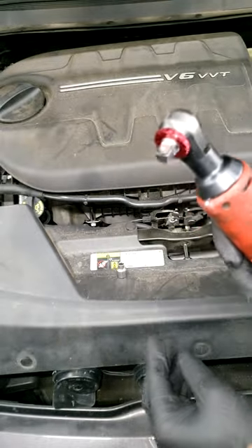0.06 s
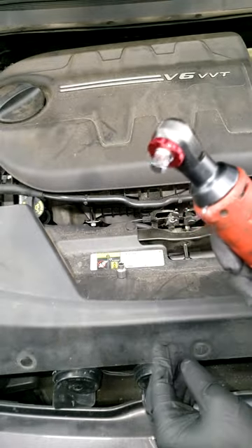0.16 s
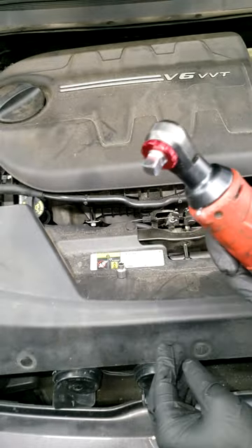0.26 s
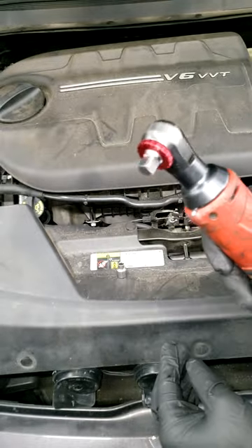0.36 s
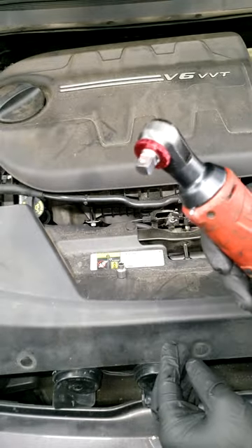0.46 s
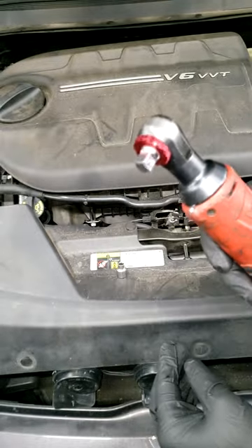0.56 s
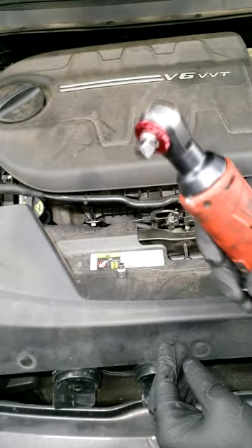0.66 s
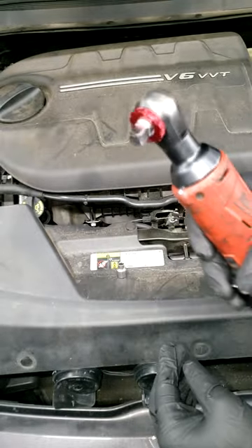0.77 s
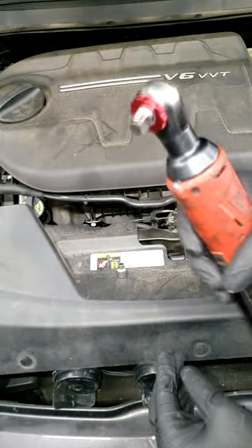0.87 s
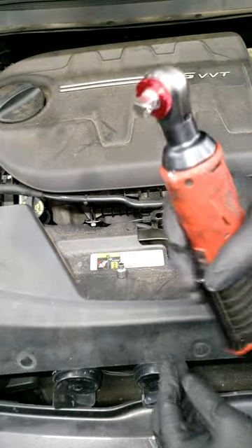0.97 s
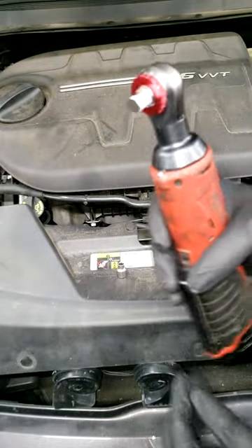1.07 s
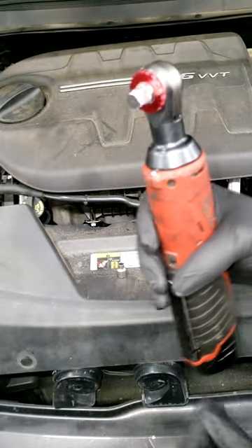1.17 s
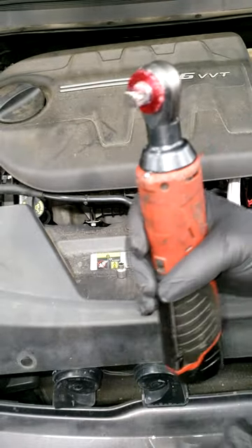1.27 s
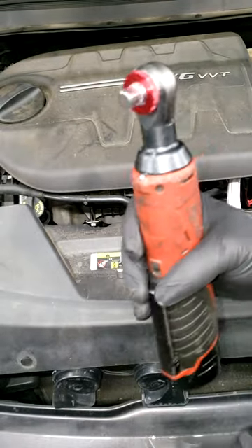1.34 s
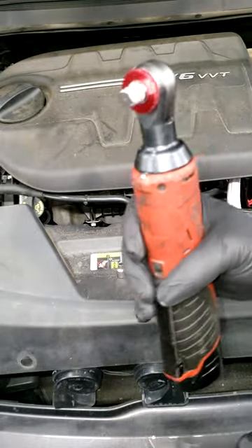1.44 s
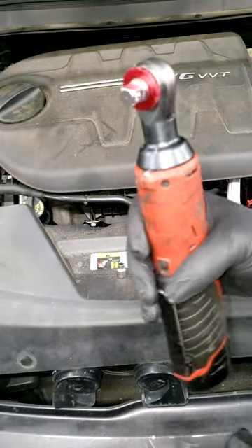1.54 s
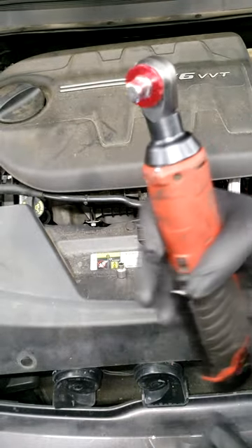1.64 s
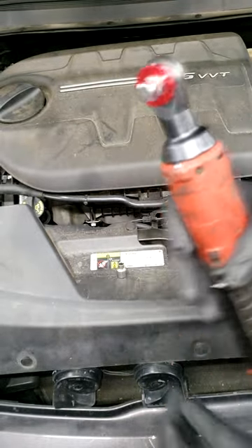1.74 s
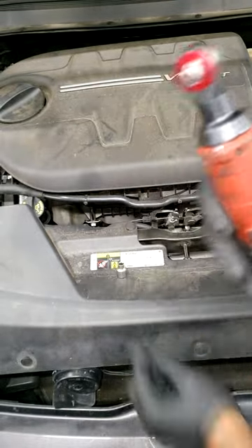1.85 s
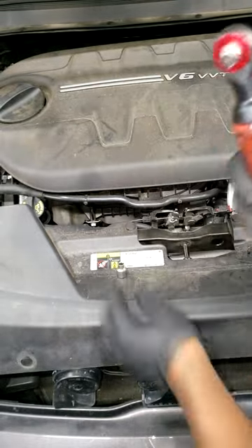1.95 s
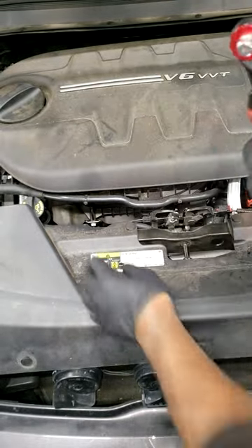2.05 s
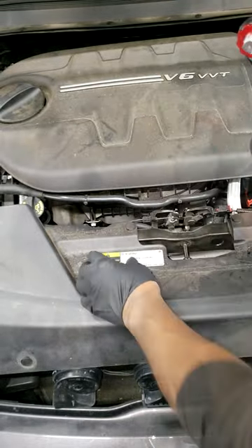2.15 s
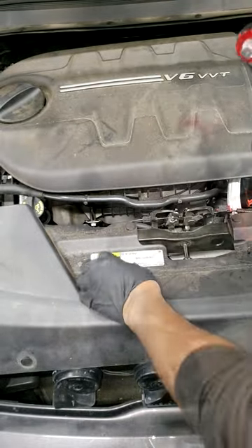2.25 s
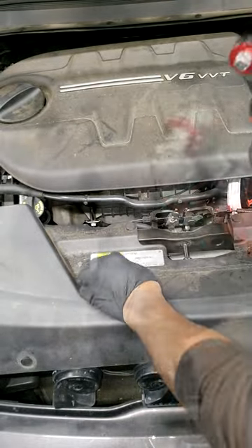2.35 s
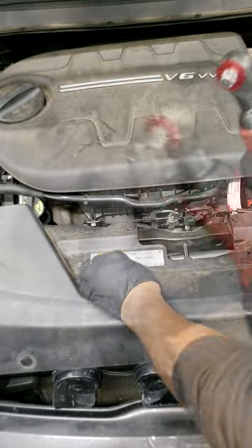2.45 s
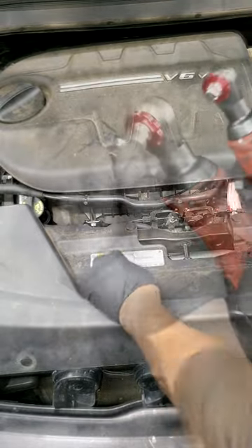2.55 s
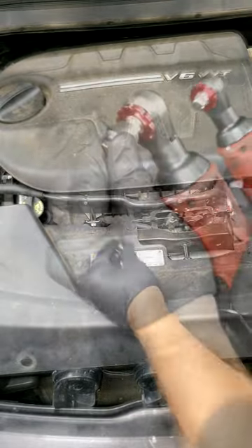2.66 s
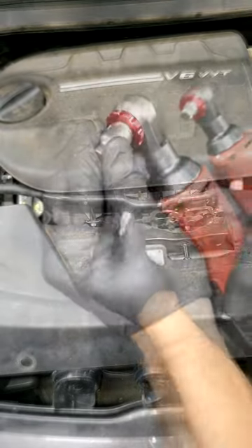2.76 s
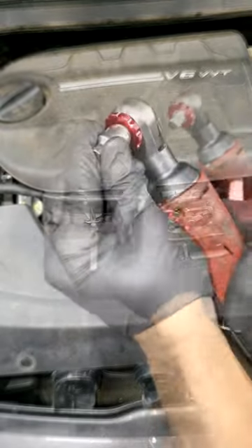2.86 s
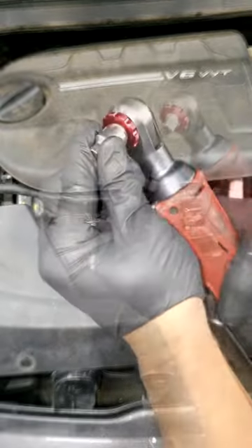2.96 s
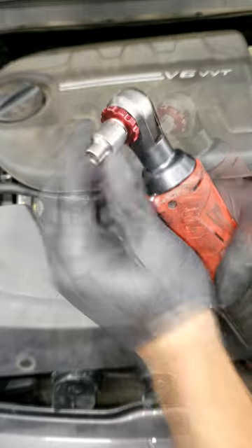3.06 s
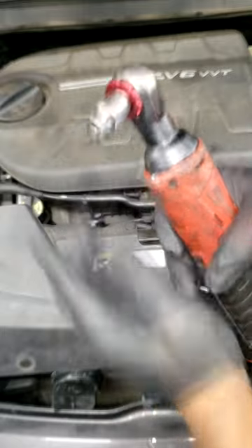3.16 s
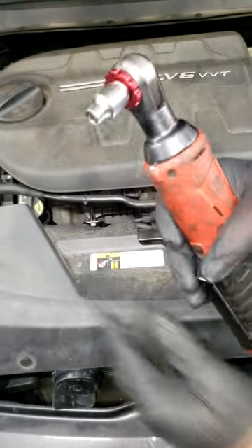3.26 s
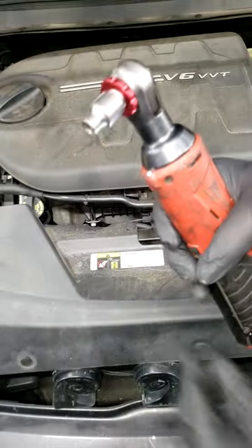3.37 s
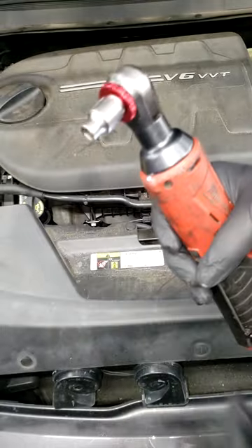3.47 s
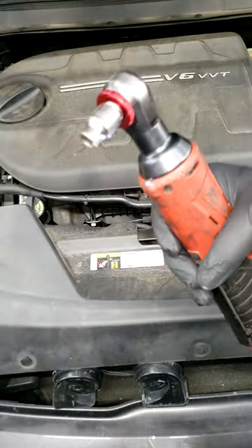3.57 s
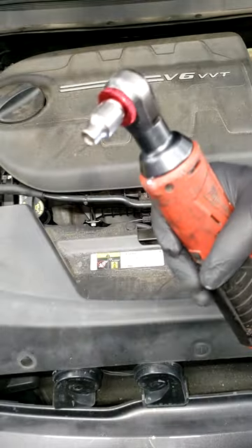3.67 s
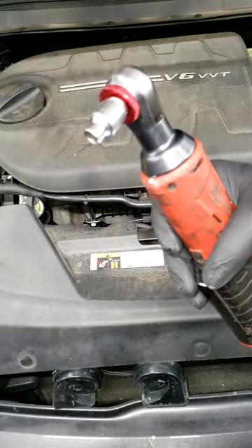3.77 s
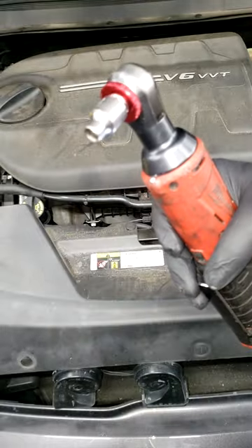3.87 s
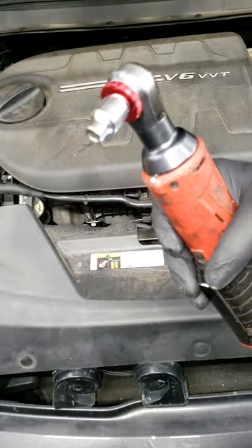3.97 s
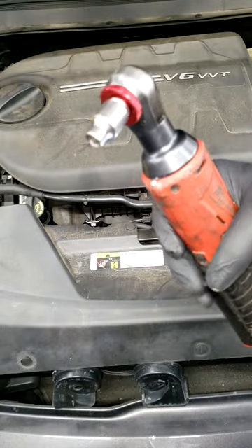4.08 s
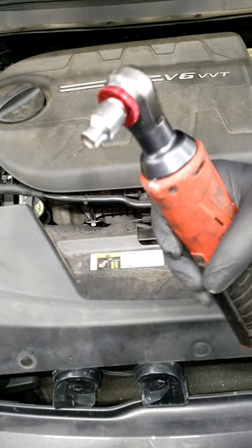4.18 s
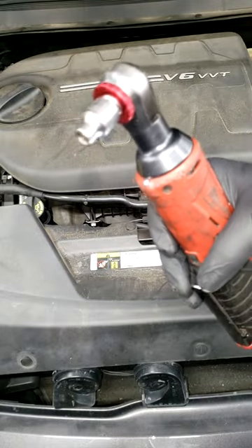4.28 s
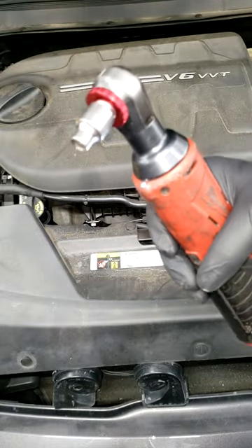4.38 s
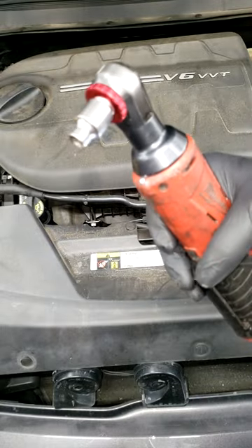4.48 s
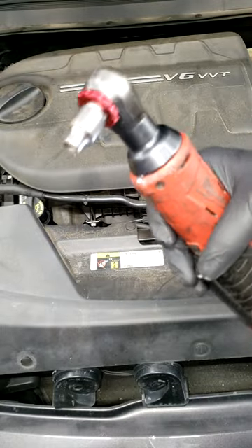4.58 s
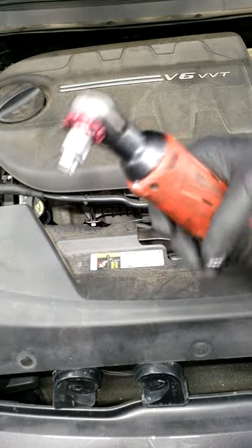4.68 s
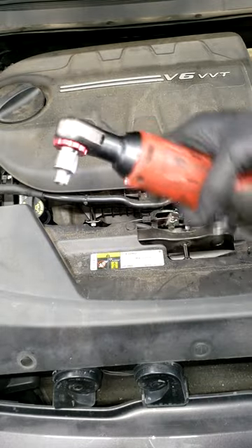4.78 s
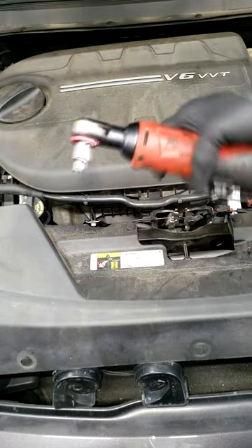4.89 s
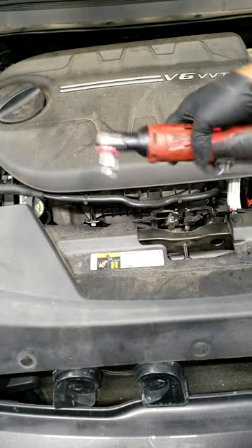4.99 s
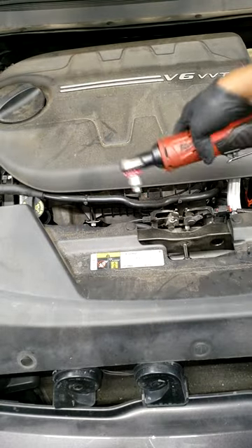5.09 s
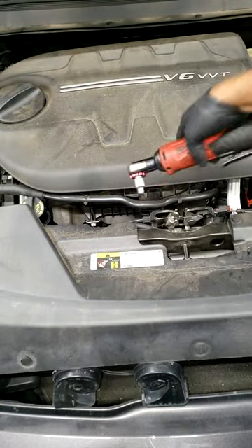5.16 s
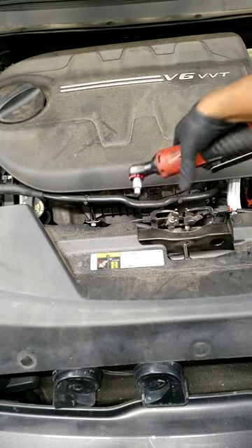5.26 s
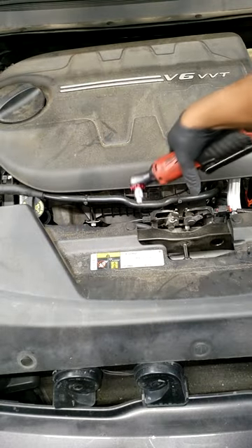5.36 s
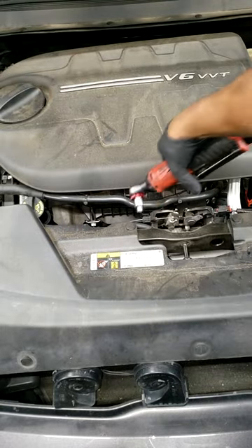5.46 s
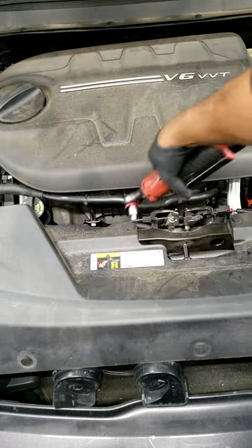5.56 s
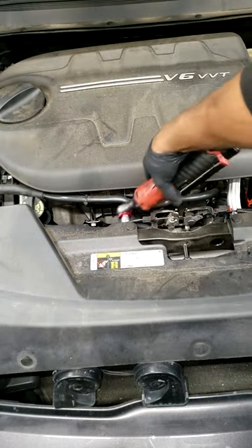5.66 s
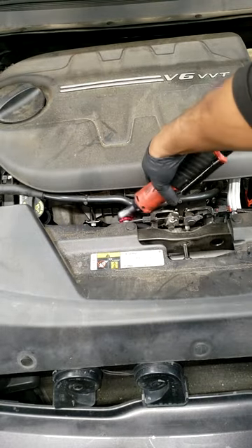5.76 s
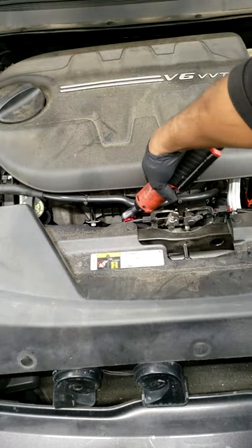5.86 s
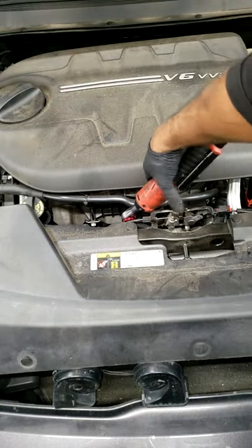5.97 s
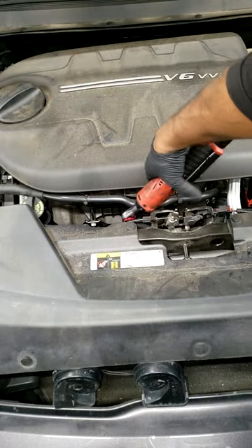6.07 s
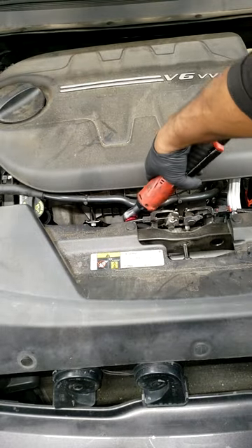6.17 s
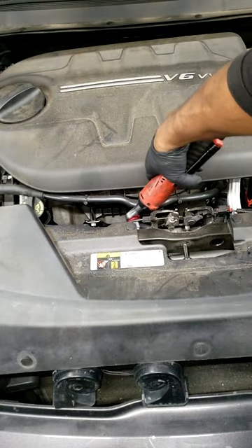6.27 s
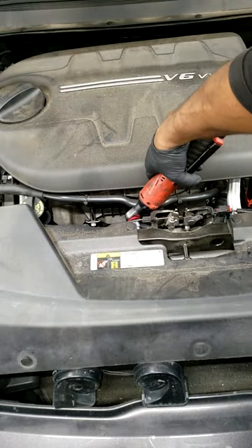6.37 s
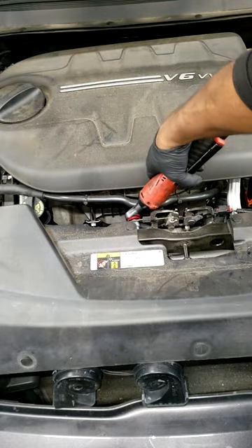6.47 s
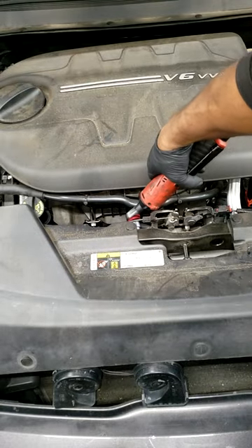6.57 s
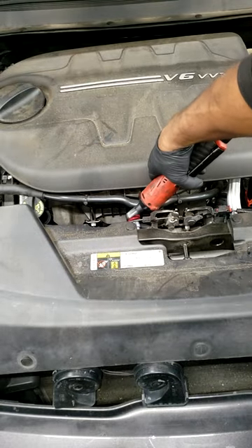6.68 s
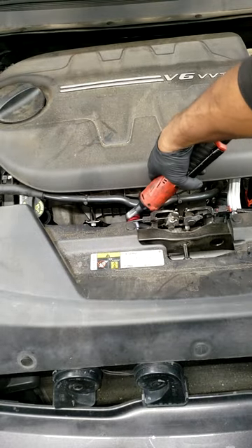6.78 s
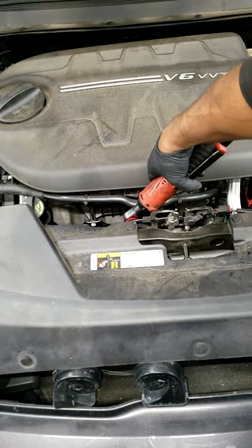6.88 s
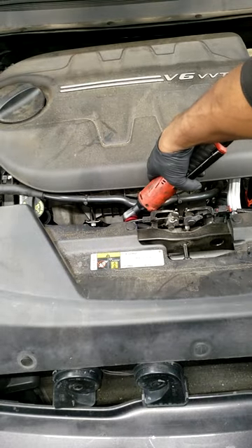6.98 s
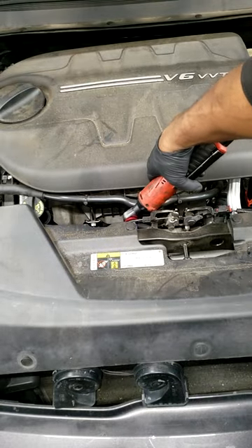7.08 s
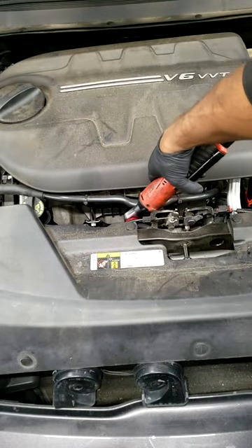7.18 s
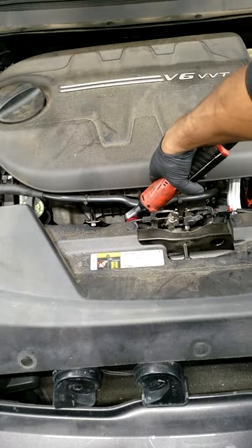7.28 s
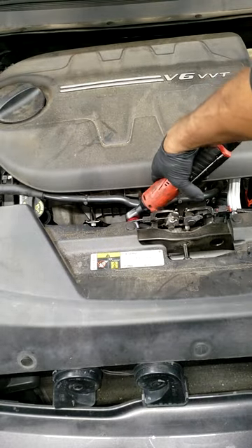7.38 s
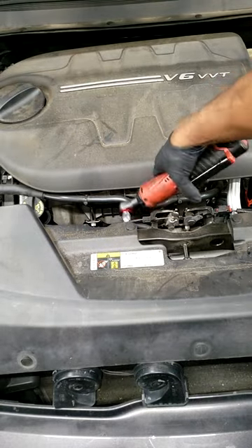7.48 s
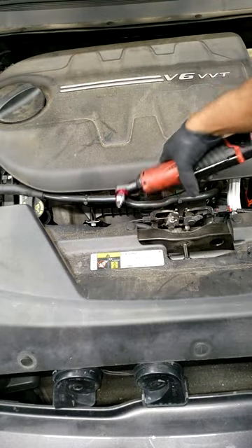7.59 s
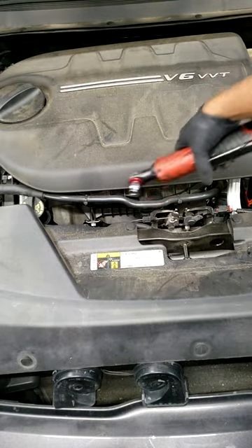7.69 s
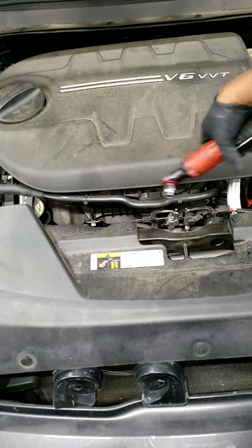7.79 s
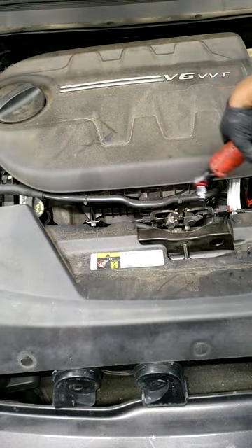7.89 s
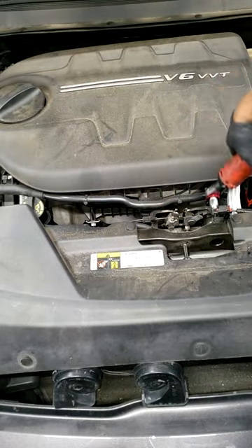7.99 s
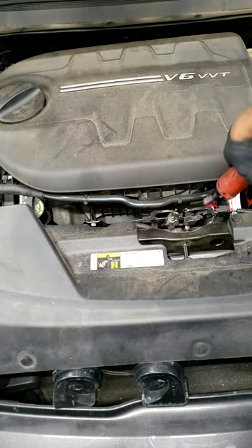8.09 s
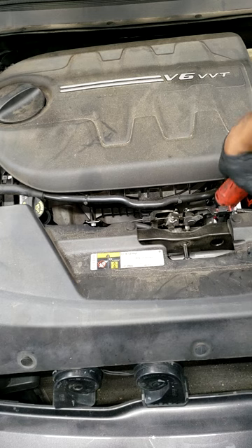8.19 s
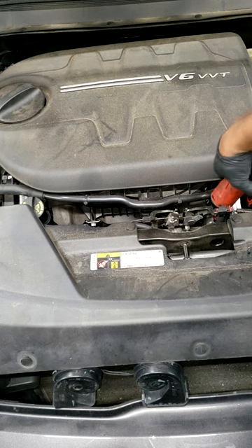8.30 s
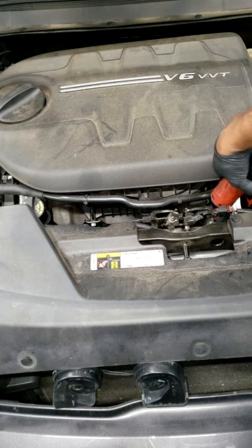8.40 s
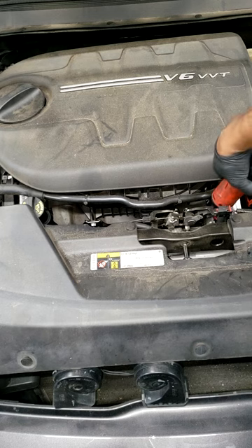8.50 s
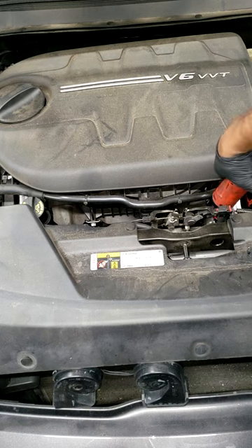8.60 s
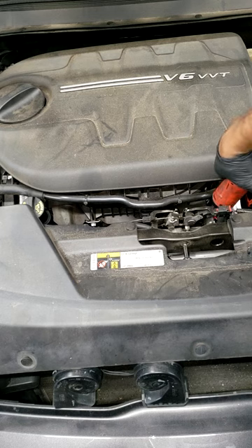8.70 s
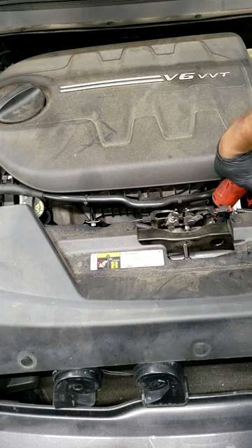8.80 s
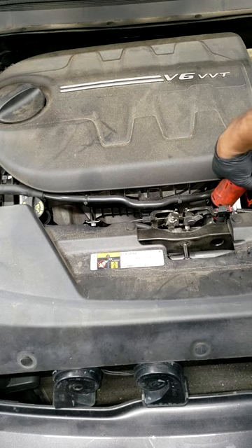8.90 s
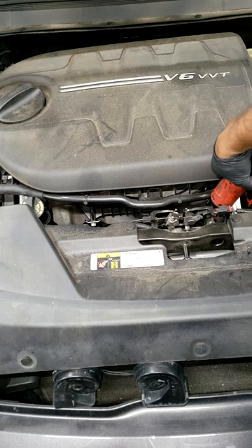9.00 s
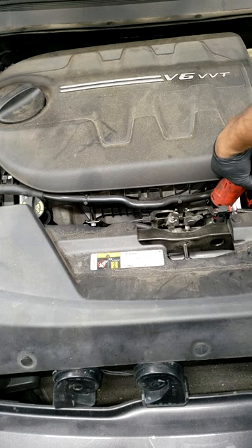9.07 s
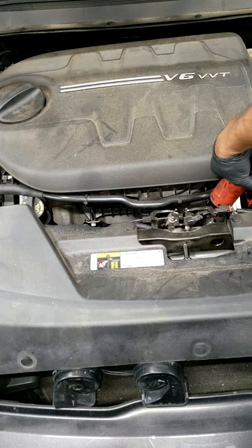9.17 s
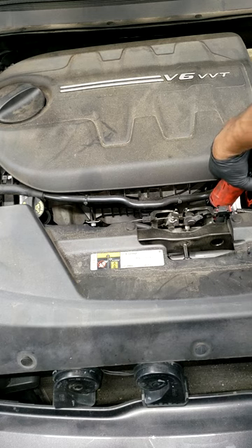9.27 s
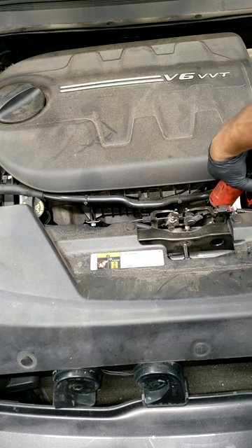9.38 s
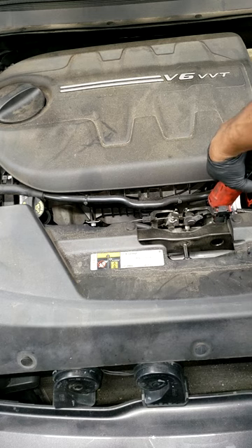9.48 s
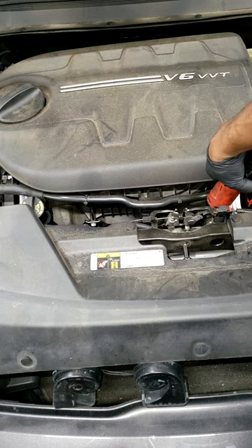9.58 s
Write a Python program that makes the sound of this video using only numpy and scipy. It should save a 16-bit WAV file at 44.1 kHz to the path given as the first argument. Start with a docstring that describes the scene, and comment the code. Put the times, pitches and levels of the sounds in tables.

```python
"""Cordless ratchet over an engine bay

It is blipped in the air, gets a socket snapped on, is blipped again, then spins two bolts; a workshop hums behind.
A crank model (run-up, then friction and drag) gives the speed, and its turns time every contact of the mechanism.
The pawl clacks and rings the steel head (clicks exciting noise bursts), the gears rattle and the motor whines;
left to coast, the tool slows towards single clacks. Seated on a bolt it shakes panels: a drone, a buzz and chatter."""
import sys
import numpy as np
from scipy import signal
from scipy.fft import rfft, irfft
from scipy.io import wavfile
from scipy.ndimage import uniform_filter1d

SR = 44100
rng = np.random.default_rng(int(sys.argv[2]) if len(sys.argv) > 2 else 0)


def transcribe(signal):
    """Save signal, clipped to [-1, 1], as a 16-bit WAV file at the path in sys.argv[1]."""
    frames = np.atleast_2d(signal).T
    limited = np.clip(frames, -1, 1)
    pcm = np.round(limited * 32767).astype(np.int16)
    wavfile.write(sys.argv[1], SR, pcm)


N = 425124   # length in samples


def from_db(db):
    """Amplitude ratio: 20 dB for each factor of ten."""
    return 10 ** (np.asarray(db) / 20)


def rms_one(x):
    """Normalisation to unit root-mean-square amplitude."""
    return x / np.sqrt(np.mean(x ** 2) + 1e-20)


def in_time(rows, **ends):
    """Linear interpolation of rows of (t/s, value) at every sample."""
    return np.interp(np.arange(N) / SR, *np.transpose(rows), **ends)


def gain_curve(tables):
    """Envelope: gain along tables of (t/s, level/dB), silent between them."""
    return sum(from_db(in_time(rows, left=-np.inf, right=-np.inf)) for rows in tables)


def band(x, hz, kind):
    """Butterworth filtering: maximally flat in the passed band."""
    edges = np.minimum(hz, .45 * SR)
    return signal.sosfilt(signal.butter(2, edges, kind, fs=SR, output="sos"), x)


def convolve(x, response):
    """Linear superposition: each sample sets off a copy of the impulse response."""
    return signal.oaconvolve(np.atleast_2d(x), np.atleast_2d(response), axes=-1)[:, :N]


def response_of(spectrum, size=4096):
    """Minimum phase: folding the cepstrum gives the causal response of a magnitude spectrum."""
    hz, db = np.transpose(spectrum)
    grid = np.maximum(np.arange(size // 2 + 1) * SR / size, 1)
    magnitude = from_db(np.interp(np.log(grid), np.log(hz), db))
    cepstrum = irfft(np.log(magnitude))
    cepstrum[1:size // 2] *= 2
    cepstrum[size // 2 + 1:] = 0
    return irfft(np.exp(rfft(cepstrum)))


def colour(x, spectrum):
    """Spectral shaping by a unit-energy response, which keeps the power of a white sound."""
    response = response_of(spectrum)
    return convolve(x, response / np.linalg.norm(response))


# width of the stereo image: f/Hz, level of side minus mid/dB
WIDTH_SPECTRUM = [(100, -13), (400, -12), (1200, -8.5), (4000, 3.5), (15000, -6.5)]


def stereo_noise():
    """Mid-side stereo: white noise, alike on both sides in the bass and less so in the treble."""
    mid, side = rng.standard_normal((2, N))
    return mid + convolve(side, response_of(WIDTH_SPECTRUM)) * [[1], [-1]]


def clicks_at(seconds, sizes):
    """Impulse train: one sample of the given size at each time."""
    samples = np.clip(np.asarray(seconds) * SR, 0, N - 1).astype(int)
    return np.bincount(samples, sizes, N)


def bursts(clicks, t60):
    """Exponential decay: each click excites a dense cluster of modes, as noise losing 60 dB in t60 seconds."""
    keep_per_sample = from_db(-120 / (t60 * SR))   # acts on power
    power = signal.lfilter([1], [1, -keep_per_sample], clicks ** 2 + 1e-18)
    return np.sqrt(power) * stereo_noise()


def evened(x, hz, size=2400):
    """Slow level normalisation: holds the level within a band near 1, keeping the single strokes."""
    power = band(x.mean(0), hz, "band") ** 2
    slow = uniform_filter1d(uniform_filter1d(power, size), size)
    return x / np.sqrt(np.abs(slow) + power.mean() / 1000)


def echoes(t60, seconds):
    """Diffuse reverberation: decaying noise of unit energy, different on each side."""
    t = np.arange(int(seconds * SR)) / SR
    tail = rng.standard_normal((2, len(t))) * from_db(-60 * t / t60) * (t > .002)
    return tail / np.linalg.norm(tail, axis=1, keepdims=True)


def strokes(turns, place, scatter_db, jitter_s):
    """Periodic impact: one contact per crank turn, at a given place in the turn."""
    at = np.flatnonzero(np.diff(np.floor(turns - place)) > 0) / SR
    late, force = rng.standard_normal((len(at), 2)).T
    return clicks_at(at + jitter_s * late, from_db(scatter_db * force))


def rattle(speed, per_turn, scatter_db):
    """Random impact process: chance contacts of loose parts, denser as the crank speeds up."""
    struck = rng.random(N) < per_turn * speed / SR
    return struck * from_db(scatter_db * np.minimum(rng.standard_normal(N), 2))


# trigger pulls: t/s, time held/s
TRIGGER_PULLS = [(.0065, .0464), (.3497, .0292), (.6404, .0287), (.9306, .0429), (1.2777, .0894),
                 (3.4502, .2356), (4.1898, .0218), (4.4799, .0047), (6.2658, .8305), (8.866, .9)]
TOP_SPEED, SPIN_UP_S = 87.6, .0422   # speed approached (strokes per s), time constant of the run-up (s)
FRICTION, DRAG_PER_S = 56.84, .594   # dry friction (strokes per s lost each second), drag (per s)


def crank_speed():
    """First-order dynamics: a pull runs the crank up towards top speed; let go, friction and drag slow it."""
    speed, brake = np.zeros(N), FRICTION / DRAG_PER_S
    for s, held in TRIGGER_PULLS:
        start = int(s * SR)
        t = np.arange(N - start) / SR
        run_up = np.exp(-np.minimum(t, held) / SPIN_UP_S)
        driven = TOP_SPEED + (speed[start] - TOP_SPEED) * run_up
        coast = np.exp(-DRAG_PER_S * np.maximum(t - held, 0))
        speed[start:] = np.maximum((driven + brake) * coast - brake, 0)
    return speed


def pace(speed):
    """Scaling variable of excitation: crank speed averaged over 66 ms, 1 at 60 strokes per s."""
    return np.abs(uniform_filter1d(speed, size=2900)) / 60


LIFT_DB_PER_S = 200   # fall once the socket comes off


def seated(on, lifted):
    """Contact coupling: 1 while the socket sits on a bolt, decaying exponentially once it is lifted."""
    t = np.arange(N) / SR
    return (t > on) * from_db(-LIFT_DB_PER_S * np.maximum(t - lifted, 0))


# loudness as the tool is turned and moved about: t/s, relative pawl level/dB, relative gear level/dB
TOOL_LOUDNESS = [(0, -15.5, -24), (0.999, -18.5, -28), (1.55, -20, -30), (2.3, -23.5, -31),
                 (3.55, -24.5, -30.5), (4.2, -22, -36), (5, -28, -31.5), (6.4, -23.5, -30.5),
                 (7.1, -24.5, -36.5), (8.05, -25, -32), (8.9, -27, -33), (9.64, -25, -32)]
# socket on a bolt, also used by panels: on t/s, lifted t/s, relative level of the panel shaking/dB
BOLT_CONTACTS = [(6.25, 7.39, -32), (8.85, 9.64, -32.5)]
SEATED_PAWL_DB = -4


def pawl_db():
    """Contact damping: the relative level of the pawl is lower while a bolt holds the head."""
    on_bolt = sum(seated(on, lifted) for on, lifted, _ in BOLT_CONTACTS)
    return in_time(np.array(TOOL_LOUDNESS)[:, :2]) + SEATED_PAWL_DB * on_bolt


def gears_db():
    """Source level: the relative level shared by the gear train and motor."""
    return in_time(np.array(TOOL_LOUDNESS)[:, ::2])


# spectrum of the workshop: f/Hz, relative level per Hz/dB
SHOP_SPECTRUM = [(22, -19.5), (60, 1.5), (120, -5.5), (250, -14), (420, -22.5), (800, -49.5), (1500, -30.5),
                 (2500, -46), (4500, -49), (7000, -40), (9000, -54), (16000, -44.5)]
# rumble of the workshop: t/s, level/dB
SHOP_RUMBLE = [(0, -52), (1.7, -61.5), (2.4, -53.5), (3.3, -54.5), (4.1, -65), (5.4, -62.5), (9.64, -57)]


def workshop():
    """Broadband flow noise of ventilation: a low rumble that swells and sinks, under a faint hiss."""
    air = colour(stereo_noise(), SHOP_SPECTRUM)
    rumble = from_db(in_time(SHOP_RUMBLE)) * rms_one(band(air, 227, "low"))
    hiss = from_db(-72.0) * rms_one(band(air, 470, "high"))
    return rumble + hiss


# motor driver chirps at a trigger pull: t/s, relative level/dB
DRIVER_CHIRPS = [(3.451, -55.5), (6.246, -59), (8.845, -67)]
# glove rubbing on the handle, one table a rub: t/s, level/dB
GLOVE_RUBS = [
    [(3, -73), (3.06, -71), (3.14, -79)],
    [(5.23, -96), (5.3, -73.5), (5.5, -73.5), (5.69, -82)],
]
DRIVER_HZ = 1860


def handling():
    """Harmonic and frictional excitation: the pulsed motor driver sings for an instant; the glove rustles."""
    t = np.arange(N) / SR
    tone = sum(np.sin(2 * np.pi * k * DRIVER_HZ * t) / k ** .5 for k in range(1, 5))
    chirps = sum(from_db(db) * np.exp(-((t - s) / 0.0081) ** 2) for s, db in DRIVER_CHIRPS)
    grit = bursts(1. * (rng.random(N) < 900 / SR), t60=.01)   # 900 grains per s
    rustle = rms_one(band(grit, [1250, 1750], "band") + 0.45 * band(grit, [2400, 3100], "band"))
    return tone * chirps + rustle * gain_curve(GLOVE_RUBS)


# notes that panels keep after a landing: t/s, f/Hz, initial level/dB
PANEL_NOTES = [(5.81, 529, -65), (8.262, 279.6, -60)]


def singing_panels(t60):
    """Free vibration of a single mode: a knocked panel keeps one faint, decaying note."""
    t = np.arange(N) / SR
    notes = 0
    for s, hz, db in PANEL_NOTES:
        decay = (t > s) * from_db(db - 60 * np.abs(t - s) / t60)
        notes += decay * np.sin(2 * np.pi * hz * (t - s))
    return notes


# socket handled and snapped on, small parts ticking: t/s, relative crack level/dB, relative ring level/dB
SOCKET_SNAPS = [(2.7742, -12.5, -35), (3.029, -51, -63), (3.203, -39.5, -64.5), (3.36, -33.5, -59.5),
                (6.144, -48, -61), (8.72, -47, -66)]
# socket landing on a bolt head: t/s, relative steel level/dB, relative panel level/dB
SOCKET_LANDINGS = [(5.704, -31.5, -31), (5.712, -45, -45.5), (5.81, -57, -40), (5.851, -75, -50.5),
                   (8.224, -25, -34.5), (8.261, -32, -32.5)]
# spectrum of the socket: f/Hz, relative level per Hz/dB
SOCKET_SPECTRUM = [(300, -21), (1800, -6), (2800, -7), (4300, -10), (7000, 1.5), (8300, -15), (12800, -1),
                   (16000, -5)]
# spectrum of a knocked panel: f/Hz, relative level per Hz/dB
KNOCK_SPECTRUM = [(50, -14.5), (100, 8.5), (400, 3.5), (800, -4), (1700, 2), (3000, -13), (6000, -25.5),
                  (15000, -30)]


def socket():
    """Impact excitation: the detent cracks and rings the socket; landings clink steel and thud the panel."""
    s, crack_db, ring_db = np.transpose(SOCKET_SNAPS)
    steel = bursts(clicks_at(s, from_db(crack_db)), t60=0.0041)
    steel += bursts(clicks_at(s, from_db(ring_db)), t60=0.23)
    s, steel_db, panel_db = np.transpose(SOCKET_LANDINGS)
    steel += bursts(clicks_at(s, from_db(steel_db)), t60=0.053)
    thuds = bursts(clicks_at(s, from_db(panel_db)), t60=0.24)
    return colour(steel, SOCKET_SPECTRUM) + colour(thuds, KNOCK_SPECTRUM)


# spectrum of the shaken panels: f/Hz, relative level per Hz/dB
PANEL_SPECTRUM = [(70, -18), (130, -9.5), (300, -5.5), (560, 1.5), (800, -4), (1400, -1), (2000, -5),
                  (3000, -9), (6000, -15.5)]
# drone of each bolt's mounting, one row a bolt: relative levels of harmonics 1 to 7 of the stroke rate/dB
MOUNT_DRONES = [
    [-8, -7, -7.5, -21.5, -14, -2, -2.1],
    [-5, -13, 0.5, 2, 4, -23, 0.68],
]
# resonances each bolt's mounting adds, one table a bolt: f/Hz, relative level/dB
MOUNT_RESONANCES = [
    [(1225, -16), (1420, -8.5), (2040, -9)],
    [(1410, -11), (1645, -11), (1840, -4), (2120, -9.5)],
]


def panels(speed, turns):
    """Forced vibration: on a bolt the strokes drive a drone at their harmonics, a buzz and loose chatter."""
    thumps = strokes(turns, 0, scatter_db=2, jitter_s=.00013)
    buzz = band(convolve(thumps, echoes(t60=0.1, seconds=0.071)), 700, "high")
    chatter = bursts(rattle(speed, per_turn=5, scatter_db=-3), t60=0.093)
    blows = rms_one(chatter) + from_db(-0.5) * rms_one(buzz)
    shaking = from_db(-2.5) * evened(colour(blows, PANEL_SPECTRUM), [250, 2200])
    full_speed = (speed / speed.max()) ** 5   # the drone builds up only near top speed
    out = 0
    for (on, lifted, level_db), levels, modes in zip(BOLT_CONTACTS, MOUNT_DRONES, MOUNT_RESONANCES):
        wobble = rms_one(band(rng.standard_normal((len(levels), N)), 21, "low"))   # of the socket on the bolt
        sway = from_db(3.05 * wobble)
        drone = 0
        for k, (db, swell) in enumerate(zip(levels, sway), 1):
            drone += from_db(db) * swell * np.sin(2 * np.pi * (k * turns + rng.random()))
        ringing = 0
        for (hz, db), swell in zip(modes, sway):
            ringing += from_db(db) * swell * rms_one(band(chatter, [hz - 45, hz + 45], "band"))
        mounting = shaking + from_db(-9.0) * drone * full_speed + from_db(-5) * ringing
        out += mounting * from_db(level_db) * seated(on, lifted)
    return out * (pace(speed) / pace(speed).max()) ** 1.38


WHINE_ORDER = 13.3   # whine cycles per crank turn


def motor(speed, turns):
    """Resonant filtering: rough motor harmonics are heard as each slides through a resonance of the case."""
    whine = 0
    for k in range(1, 6):
        flutter = rms_one(band(rng.standard_normal(N), 48 * k, "low"))
        waver = .62 / k + .5 * flutter
        window_hz = [460, 740] if k == 1 else [660, 830]
        harmonic = np.sin(2 * np.pi * k * WHINE_ORDER * turns) * waver
        whine += k ** -0.1 * band(harmonic, window_hz, "band")
    return whine * from_db(gears_db() - 16.5) * (speed / 60) ** 0.25


# spectrum of the tool's housing, also used by head: f/Hz, relative level per Hz/dB
HOUSING_SPECTRUM = [(120, -35), (330, -25), (600, -24), (1050, -21), (1380, -14), (1650, -18),
                    (2050, -14.5), (3700, -21), (7000, -12), (8700, -21.5), (11200, -6), (12800, -1.5),
                    (16000, -4)]


def gears(speed, turns):
    """Random tooth impacts over a smooth rub, louder with speed and while the motor pulls the crank up."""
    acceleration = uniform_filter1d(np.gradient(speed) * SR, size=2000)
    pull = np.clip(acceleration / 300, 0, 1)
    teeth = rattle(speed + 9, per_turn=14, scatter_db=2.5)
    ticks = bursts(teeth, t60=0.0058) + from_db(-11.5) * stereo_noise()
    rattling = evened(band(colour(ticks, HOUSING_SPECTRUM), 9000, "low"), [2500, 8000])
    return rattling * from_db(gears_db() - 8.5 + 1.5 * pull) * pace(speed) ** 1.65


# cluster of close modes of the steel head: lowest f/Hz, highest f/Hz
HEAD_MODES = [12370, 13325]


def head(clicks, crack_t60, ring_t60, ring_db):
    """Modal excitation by a blow: a short crack through the housing and the bright ring of the steel head."""
    crack = colour(bursts(clicks, crack_t60), HOUSING_SPECTRUM)
    ring = band(bursts(clicks, ring_t60), HEAD_MODES, "band")
    return crack + from_db(ring_db) * ring


def pawl(speed, turns):
    """Periodic impact: the pawl drops into the teeth, bounces, and is caught on the return; faster is harder."""
    blows = strokes(turns, 0, scatter_db=0, jitter_s=.0003)
    blows += from_db(-5.5) * strokes(turns, .14, scatter_db=2.0, jitter_s=0.0011)
    blows += from_db(-4.0) * strokes(turns, .52, scatter_db=4.0, jitter_s=0.00044)
    blows += from_db(-7.5) * rattle(speed, per_turn=5.4, scatter_db=2.5)
    running = evened(head(blows, crack_t60=0.0064, ring_t60=0.017, ring_db=5.5), [11000, 15500])
    return running * from_db(pawl_db() - 5.0) * pace(speed) ** 2.82


# hard catches of the pawl, mostly as the trigger bites: t/s, relative level/dB
HARD_CATCHES = [(0.353, -24), (0.642, -11), (0.846, -3), (0.9346, 2), (1.177, -1), (1.261, -1), (1.281, -2),
                (1.6321, 2), (3.478, -12.5), (3.491, -4), (3.511, 0.5), (4.1589, -15), (6.294, -7),
                (6.5052, 2), (7.59, -10.5)]
CLACK_DB, CLACK_FULL_SPEED = 11.5, 26.6   # added to the pawl level; speed where growth ends (strokes per s)
REBOUND_TURNS, REBOUND_DB = 0.19, -3.5   # the pawl falls back a little later in the turn


def clacks(speed, turns):
    """Impact and rebound: a clack and its rebound each turn, and hard catches; each blow chatters twice."""
    each_turn = strokes(turns, 0, scatter_db=1, jitter_s=0.00012)
    each_turn += from_db(REBOUND_DB) * strokes(turns, REBOUND_TURNS, scatter_db=4, jitter_s=0.0012)
    force = from_db(pawl_db() + CLACK_DB) * (np.minimum(speed, CLACK_FULL_SPEED) / 30) ** 1.1
    s, db = np.transpose(HARD_CATCHES)
    blows = each_turn * force + clicks_at(s, from_db(db))
    at = np.flatnonzero(blows)
    gap = rng.uniform(0.0039, 0.0065, len(at))   # s
    hits = sum(clicks_at(at / SR + k * gap, blows[at] * from_db(-7 * k)) for k in range(3))
    return from_db(-5) * head(hits, crack_t60=0.0019, ring_t60=0.0084, ring_db=10.5)


# the tool is nearer the left microphone: f/Hz, level of left minus right/dB
LEFT_LEAD_SPECTRUM = [(60, 4), (500, 5), (2000, 3.5), (8000, 12.5), (15000, 4.5)]


def scene():
    """Superposition of direct and reflected sound, with level and arrival differences between the sides."""
    speed = crank_speed()
    turns = np.cumsum(speed) / SR
    ratchet = pawl(speed, turns) + clacks(speed, turns) + gears(speed, turns) + motor(speed, turns)
    direct = ratchet + panels(speed, turns) + socket() + handling() + singing_panels(t60=2.1)
    # bonnet and engine cover
    bay = from_db(-9) * convolve(band(direct, 570, "high"), echoes(t60=0.11, seconds=0.33))
    room = from_db(-10.0) * convolve(band(direct, 2500, "low"), echoes(t60=0.63, seconds=1))
    left, right = direct + bay + room + workshop()
    louder, softer = (response_of(np.array(LEFT_LEAD_SPECTRUM) * [1, side / 2]) for side in (1, -1))
    later = np.pad(softer, (1, 0))   # the right side lags by one sample
    return np.vstack([convolve(left, louder), convolve(right, later)])


CUTOFF_HZ = 15900


def record(dry):
    """Saturation and band limiting: the highest peaks are clipped, then a steep filter cuts the top."""
    steep = signal.ellip(12, .2, 70, CUTOFF_HZ, fs=SR, output="sos")
    return signal.sosfilt(steep, np.clip(dry, -1, 1))


dry = scene()
out = record(dry)
transcribe(out)
```